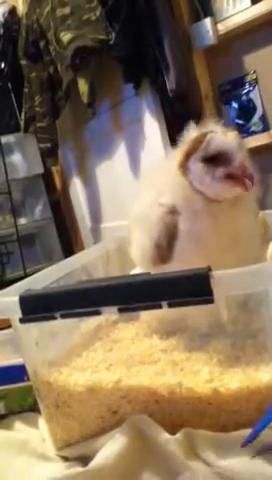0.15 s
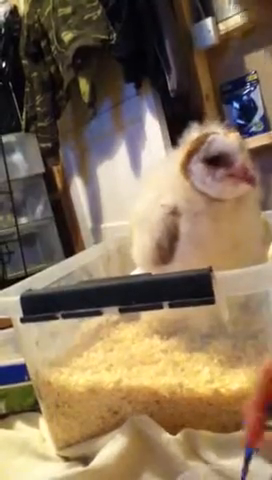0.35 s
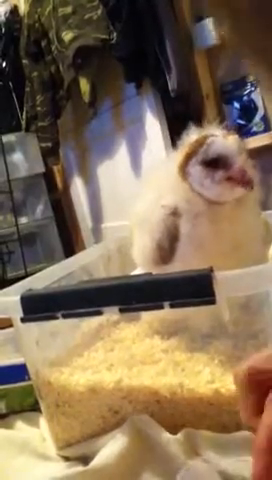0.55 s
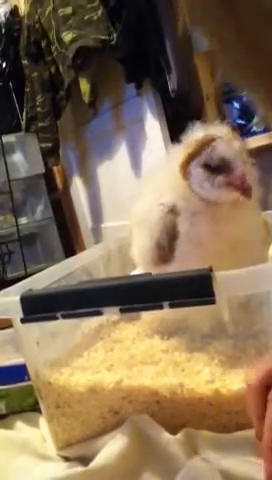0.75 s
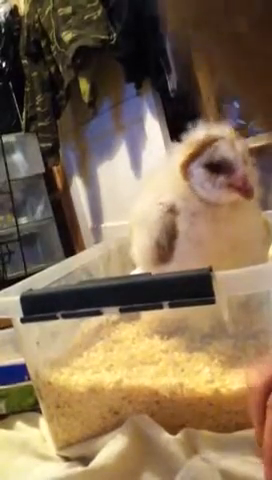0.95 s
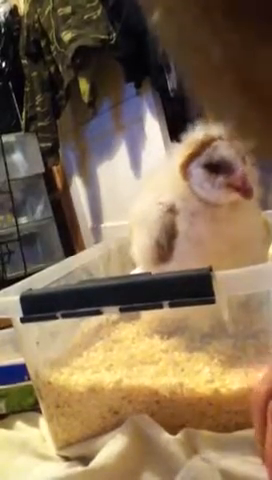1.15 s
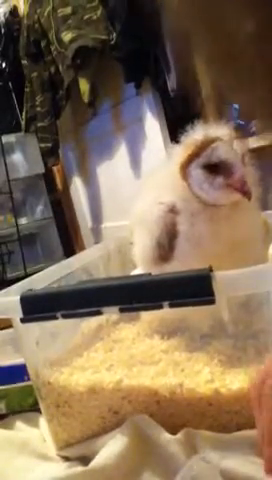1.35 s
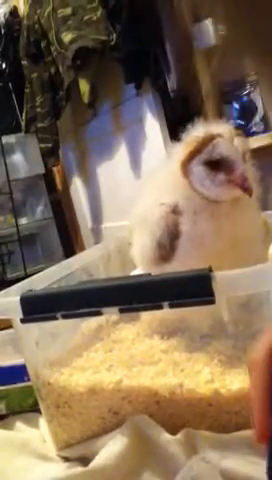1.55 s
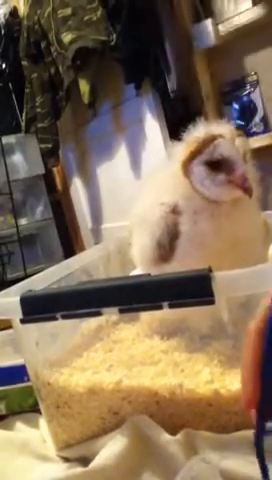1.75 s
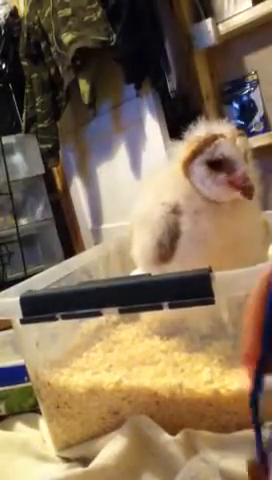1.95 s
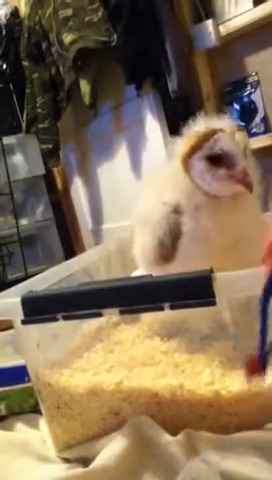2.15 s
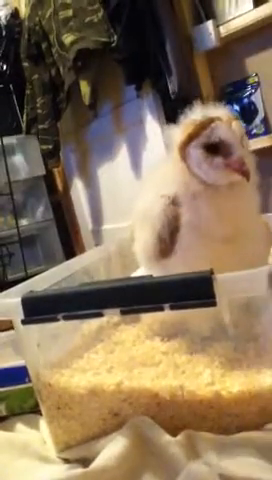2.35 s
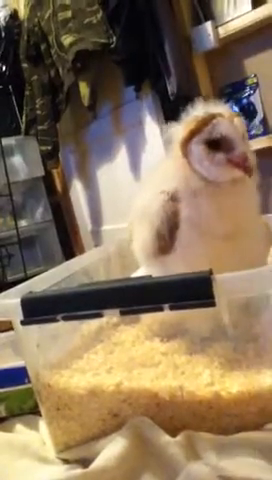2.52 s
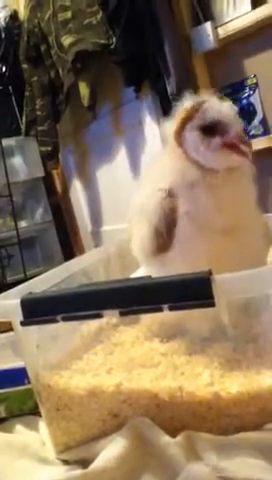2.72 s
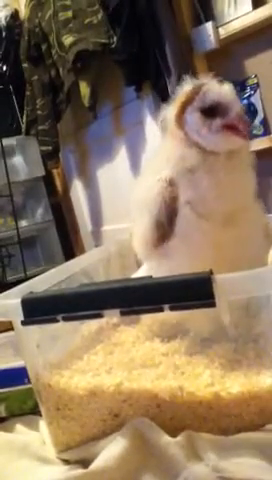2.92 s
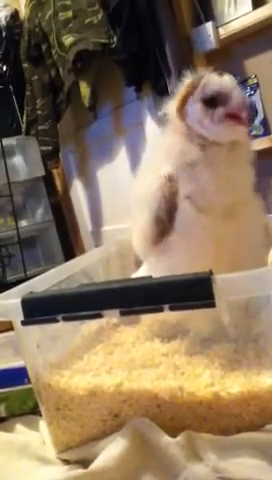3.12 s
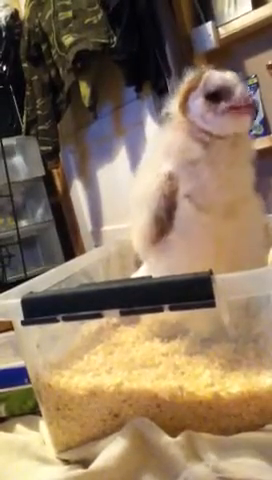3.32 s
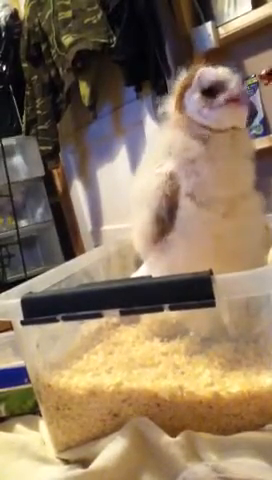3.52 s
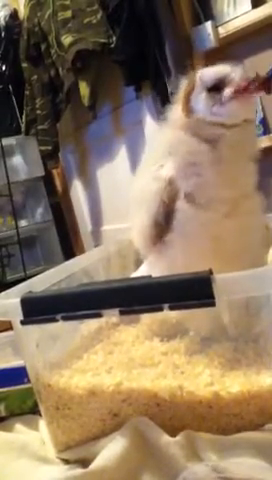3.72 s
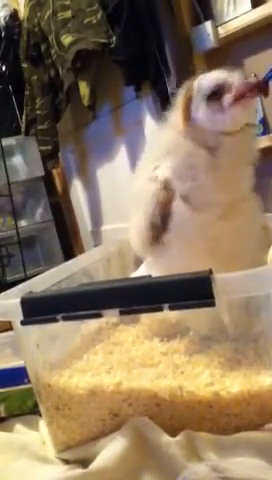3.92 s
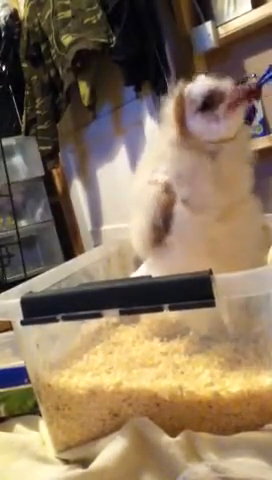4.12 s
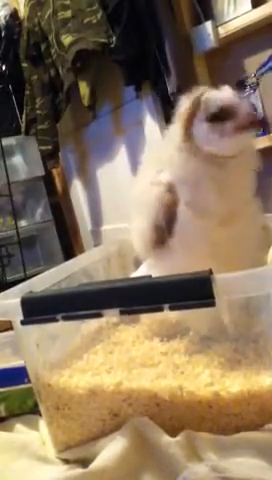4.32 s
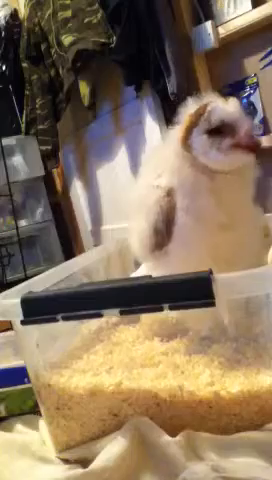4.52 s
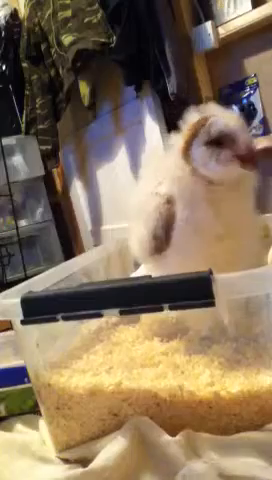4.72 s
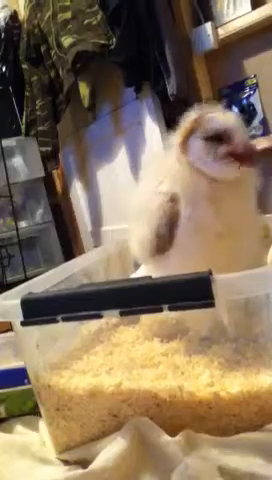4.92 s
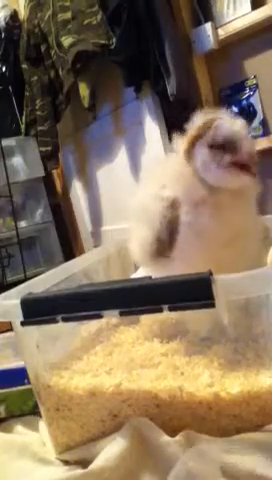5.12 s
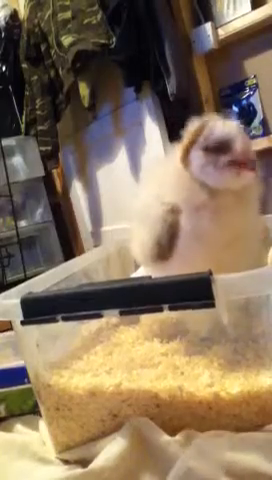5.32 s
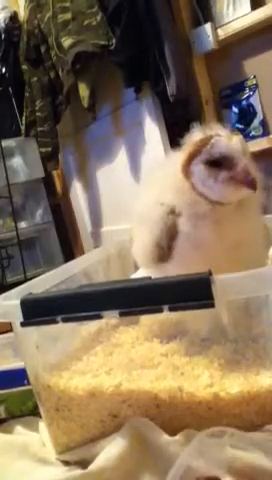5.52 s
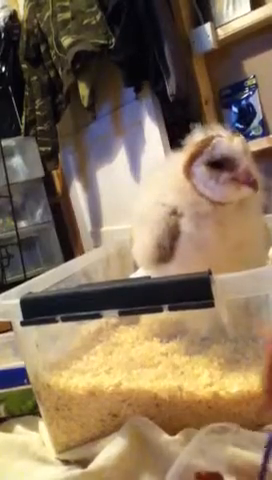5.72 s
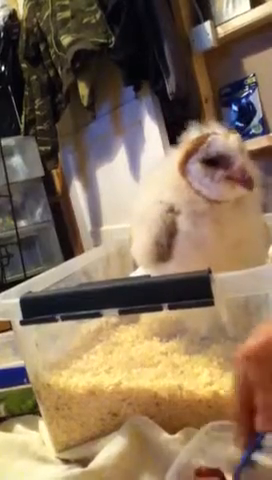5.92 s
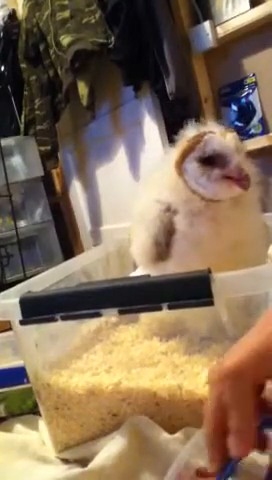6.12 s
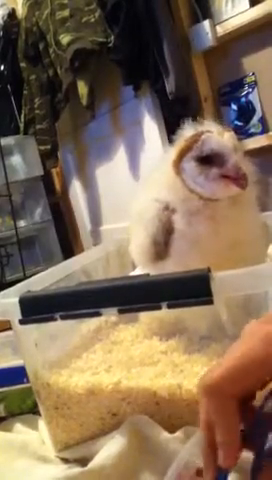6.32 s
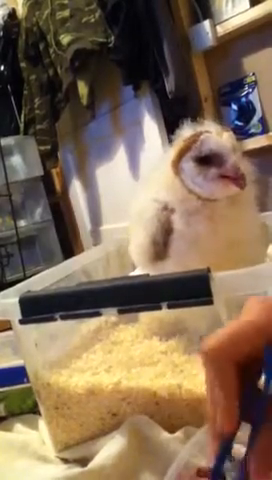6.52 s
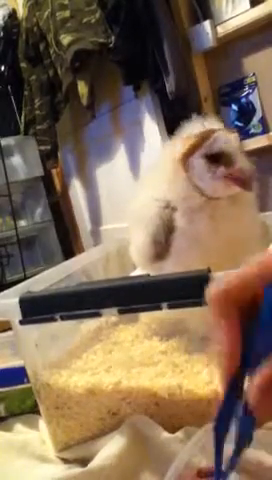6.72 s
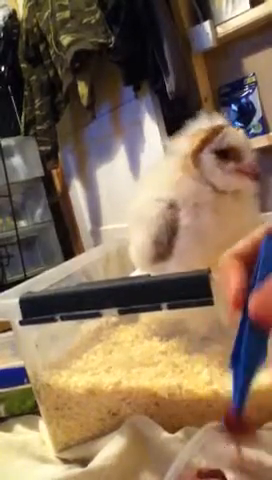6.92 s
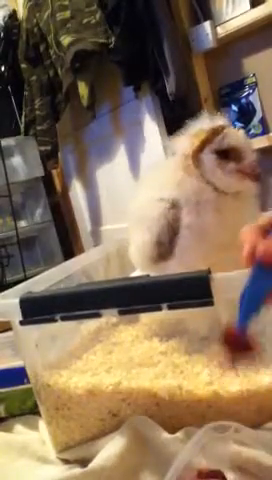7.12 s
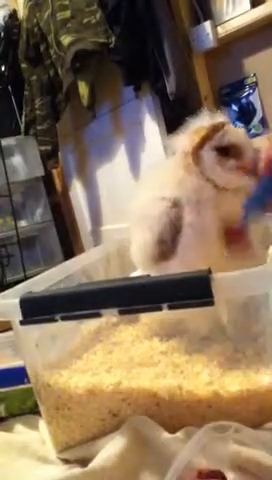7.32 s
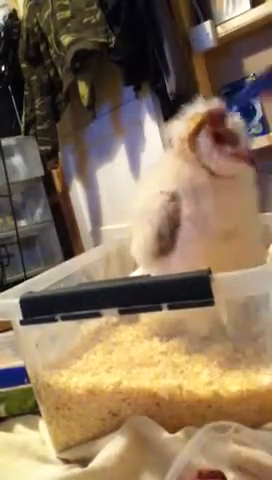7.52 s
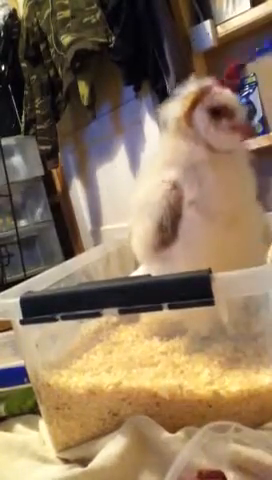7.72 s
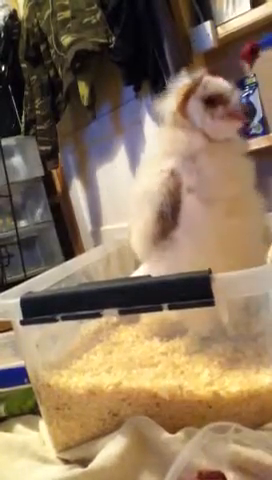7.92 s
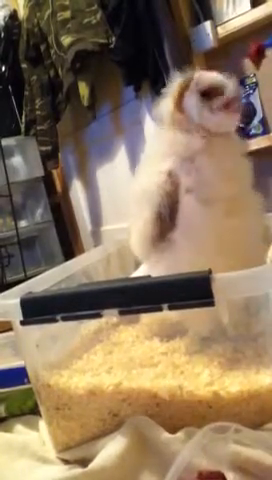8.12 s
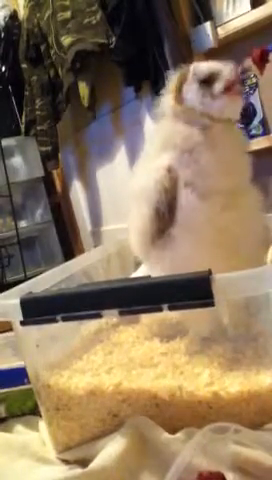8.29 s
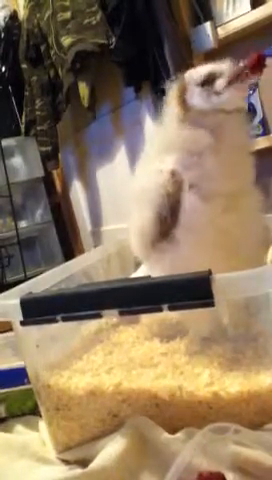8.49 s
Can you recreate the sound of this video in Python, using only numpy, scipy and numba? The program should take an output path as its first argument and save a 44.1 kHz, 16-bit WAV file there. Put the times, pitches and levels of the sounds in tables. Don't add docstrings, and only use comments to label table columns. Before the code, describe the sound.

A downy owl chick at arm's length gives four rasping, noisy hisses, each about three quarters of a second, swelling quickly and ending shut. Between them are small beak and tool ticks, slight cloth rustle and a faint distant whine. Small cluttered room, very short reverberation, low hum and soft hiss on a close mono phone microphone.

```python
import sys
import numpy as np
from scipy import signal
from scipy.fft import rfft, irfft
from scipy.io import wavfile
from scipy.ndimage import uniform_filter1d
from numba import njit

SR = 44100
rng = np.random.default_rng(int(sys.argv[2]) if len(sys.argv) > 2 else 0)


def master_out(mix):
    frames = np.transpose(np.atleast_2d(mix))
    ceiling = np.clip(frames, -1, 1)
    pcm = np.round(ceiling * 32767).astype(np.int16)
    wavfile.write(sys.argv[1], SR, pcm)


def natural_amplitude(level_db):
    exponent = np.asarray(level_db, float) / 20
    return 10 ** exponent


N = 377055


def level(x, db):
    return x * natural_amplitude(db) / np.sqrt(np.mean(x ** 2))


def add(out, start, sound, db):
    first = int(start * SR)
    out[first:first + len(sound)] += np.hanning(len(sound)) * level(sound, db)


@njit
def svf(x, hz, width):
    y, band, low = np.empty(len(x)), 0., 0.
    for i in range(len(x)):
        g = np.tan(np.pi * hz[i] / SR)
        damping = width[i] / hz[i]
        v = (band + g * (x[i] - low)) / (1 + g * (g + damping))
        band, low = 2 * v - band, low + 2 * g * v
        y[i] = damping * v
    return y


def causal(log_gain):
    cepstrum = irfft(log_gain)
    cepstrum[1:1024] *= 2
    cepstrum[1025:] = 0
    response = irfft(np.exp(rfft(cepstrum)))
    return response / np.sqrt(np.sum(response ** 2))


def resonances(modes, low_hz):
    f = np.linspace(1, SR / 2, 1025)
    power = sum(natural_amplitude(db) ** 2 / (1 + (2 * (f - hz) / width) ** 2) ** 1.5 for hz, width, db in modes)
    radiation = f ** 4 / (f ** 4 + low_hz ** 4)
    return causal(.5 * np.log(power * radiation))


def floor():
    # (frequency [Hz], level per Hz [dB])
    floor_shape = [(15, -52), (25, -17), (87, -2.5), (240, -2), (480, -11), (1190, -17.5), (8790, -22),
                   (15900, -24.5)]
    f = np.arange(N // 2 + 1) * SR / N + 1
    hz, db = np.array(floor_shape).T
    gain = natural_amplitude(np.interp(np.log(f), np.log(hz), db))
    return level(irfft(rfft(rng.standard_normal(N)) * gain, N), -56.5)


def rustle():
    # (start [s], end [s], centre [Hz], width [Hz], level [dB])
    brushes = [
        (0, .15, 2700, 600, -60),
        (.15, .27, 5000, 3000, -60),
        (2.04, 2.15, 2050, 600, -61),
        (7.45, 7.6, 130, 100, -58),
    ]
    out = np.zeros(N)
    grit = rng.standard_normal(N) * natural_amplitude(1.5 * rng.exponential(size=N))
    for start, end, hz, width, db in brushes:
        brush = grit[int(start * SR):int(end * SR)]
        add(out, start, svf(brush, hz + 0 * brush, width + 0 * brush), db)
    return out


def pips():
    # (start [s], end [s], first [Hz], last [Hz], level [dB])
    whistles = [
        (.703, .7105, 2600, 2600, -40),
        (2.587, 2.593, 3000, 3000, -49),
        (5.958, 5.968, 3600, 2700, -45),
        (8.015, 8.024, 3350, 2700, -41),
        (6.735, 6.752, 2600, 1950, -57),
        (6.748, 6.77, 3500, 2500, -55),
        (1.61, 1.74, 715, 690, -59),
        (1.7, 1.87, 700, 690, -66),
        (3.7, 3.78, 590, 590, -72),
    ]
    out = np.zeros(N)
    waver = 1 + .02 * level(uniform_filter1d(rng.standard_normal(N), size=500), 0)
    for start, end, hz, end_hz, db in whistles:
        glide = np.linspace(hz, end_hz, int((end - start) * SR))
        glide = glide * waver[int(start * SR):][:len(glide)]
        add(out, start, np.sin(2 * np.pi * np.cumsum(glide) / SR), db)
    return out


def ticks():
    # (time [s], peak level [dB], centre [Hz], width [Hz], decay by 60 dB [s])
    contacts = [(.172, -44, 4300, 1200, .012), (.173, -43, 6800, 3000, .008), (.174, -50, 2400, 900, .01),
                (.214, -46, 4300, 1200, .01), (.228, -49, 4500, 3000, .005), (1.899, -46, 6500, 5000, .004),
                (2.0555, -42, 400, 250, .012), (2.056, -43, 680, 400, .012), (2.057, -44, 2800, 450, .012),
                (2.158, -52, 400, 200, .03), (3.8036, -46, 8200, 5000, .004),
                (3.997, -49, 2500, 3000, .006), (4.716, -35, 10100, 6000, .004),
                (4.955, -45, 14000, 4000, .004), (5.4235, -46, 2200, 1600, .008),
                (5.7702, -44, 13500, 5000, .004), (6.817, -50, 2000, 2200, .008),
                (6.95, -48, 2200, 2000, .006), (7.28, -49, 3400, 2500, .006), (7.377, -47, 860, 1000, .012),
                (7.935, -47, 330, 250, .03)]
    out, t = np.zeros(N + 4096), np.arange(4096) / SR
    scrapes = rng.standard_normal((len(contacts), len(t)))
    for (start, db, hz, width, t60), grit in zip(contacts, scrapes):
        ring = (t == 0) + .12 * grit * np.exp(-np.log(1000) * t / t60)
        for _ in range(2):
            ring = svf(ring, hz + 0 * t, width + 0 * t)
        first = int(start * SR)
        out[first:first + len(t)] += natural_amplitude(db) * ring / np.abs(ring).max()
    return out[:N]


def closing():
    # (start [s], end [s], first centre [Hz], width [Hz], level [dB])
    breaths = [
        (1.385, 1.5, 2050, 350, -55),
        (1.38, 1.45, 3400, 900, -56),
        (3.39, 3.45, 1450, 120, -44),
        (6.72, 6.78, 1450, 500, -58),
    ]
    sink = .67
    out, air = np.zeros(N), rng.standard_normal(N)
    for start, end, hz, width, db in breaths:
        glide = np.linspace(hz, sink * hz, int((end - start) * SR))
        add(out, start, svf(air[int(start * SR):][:len(glide)], glide, width + 0 * glide), db)
    return out


def syrinx(effort):
    cycles = np.cumsum(420 + 800 * effort ** 2) / SR
    gap = rng.gamma(7, 1 / 7, N // 20)
    size = natural_amplitude(2.4 * rng.standard_normal(N // 20))
    snaps = np.cumsum(gap)
    now = snaps < cycles[-1]
    pops = np.bincount(np.searchsorted(cycles, snaps[now]), size[now], N)
    puff_s = .0008
    puffs = signal.lfilter([1], [1, -np.exp(-1 / (puff_s * SR))], pops)
    turbulence = puffs + .33 + 1.0 * effort ** 2
    air = 5.8 * pops + turbulence * rng.standard_normal(N)
    return air / np.sqrt(uniform_filter1d(air ** 2, size=1200))


def effort_db(t, length, full_db, swell_s, catch_s):
    opening_db, build_db_per_s = -43.5, 4
    shut_db, shut_share, fade_db_per_s = -47, .38, 330
    catch_db, catch_share = -4, .3
    body = full_db + build_db_per_s * (t - length)
    swell = (opening_db - body) * np.exp(-t / swell_s)
    stall = catch_db * np.exp(-((t - catch_s) / (catch_share * swell_s)) ** 2)
    shut = (shut_db - full_db) * np.exp(np.minimum(t - length, 0) / (shut_share * swell_s))
    return body + swell + stall + shut - fade_db_per_s * np.maximum(t - length, 0)


def owl():
    # (hiss starts [s], beak shuts [s], full level [dB], swell time [s], breath catches after [s])
    calls = [
        (0.7081, 1.397, -22, .075, .1),
        (2.591, 3.415, -18.5, 0.073, .032),
        (5.963, 6.733, -22, .055, .035),
        (8.022, 8.75, -17, .07, .04),
    ]
    # (treble hidden while opening [0-1], while shutting [0-1],
    # late posture reached after [s], extra fade [dB/s])
    beak_moves = [
        (0.73, 0.55, 0.68, 3),
        (0.24, 0.54, 0.55, 249.5),
        (0.08, .01, 0.63, -20),
        (.01, .01, 0.45, 1),
    ]
    # (early [Hz], late [Hz], width [Hz], early level [dB], late level [dB])
    sunk = [(1880, 2040, 730, -6, -8), (3150, 3090, 600, 0, -3.5), (3780, 3800, 1260, -1.5, -3.5),
            (5620, 5630, 1500, -2.5, -3.5)]
    stretched = [(1710, 1680, 380, -9.5, -10.5), (3160, 3020, 730, -4, -0.5), (4150, 4040, 800, -14, -12.5),
                 (5620, 5256, 1270, -6.5, -6.5)]
    reaching = [(1730, 1670, 270, -10, -7.5), (2900, 3060, 520, -3, 1), (4400, 4030, 970, -9.5, -7),
                (5670, 5500, 1000, -5.5, -6)]
    # (centre [Hz], width [Hz], early level [dB], late level [dB])
    beaks = [
        [(7580, 1660, -2.5, -5), (9830, 1500, -3.5, -7), (11350, 1100, -12, -9.5), (12500, 2000, -8.5, -15),
         (13950, 500, -17, -19), (15250, 700, -18, -28)],
        [(7070, 1100, -7, -10), (8050, 1470, -14, -1.5), (9250, 1700, -3, -13.5), (11900, 1600, -8.5, -30),
         (13400, 1100, -24, -10.5), (14360, 700, -11, -21), (15200, 700, -19, -19)],
        [(7162, 1110, -5, -10), (9550, 1400, -4, -9.5), (10300, 1400, -3.5, -10), (11950, 1500, -8.5, -9.5),
         (13650, 450, -13, -19), (14430, 500, -15, -13)],
        [(7330, 1600, -2.5, -2.5), (8336, 1010, -1.5, -5.5), (9730, 1400, -0.5, -5.5), (11550, 1900, -5, -7.5),
         (13950, 500, -25, -21), (14700, 500, -27, -28)],
    ]
    # (centre [Hz], width [Hz], level [dB])
    windpipe = [(690, 360, 17), (1000, 500, -10), (430, 260, -16)]
    # (time [s], centre [Hz], depth [0-1])
    echo_notch = [(.75, 8900, .98), (.85, 9000, .95), (.87, 8700, .01), (1.2, 8800, 0.2), (1.35, 9200, 0.8),
                  (2.6, 11200, .3), (2.88, 9500, .1), (2.93, 9550, .65), (3.07, 10300, .75),
                  (3.15, 12100, 0.99), (3.33, 12200, .98), (3.42, 11300, .8), (5.96, 8510, .06),
                  (6.7, 8410, .1), (8.02, 6486, 0.59), (8.25, 6160, 0.64)]
    settle_s = .11
    muffle_hz, opens_s, shuts_s = 7550, .16, .04

    time = np.arange(N) / SR
    out, level_db, shut = np.zeros(N), np.full(N, -120.), np.zeros(N)
    spans = [slice(int(start * SR), min(int(end * SR) + SR // 8, N)) for start, end, *_ in calls]
    for now, (start, end, *effort), (hidden_open, hidden_shut, _, fade) in zip(spans, calls, beak_moves):
        t = time[now]
        level_db[now] = effort_db(t - start, end - start, *effort) - fade * np.maximum(t - end, 0)
        opening = hidden_open * np.exp(-((t - start) / opens_s) ** 2)
        shutting = hidden_shut * np.clip(1 + (t - end) / shuts_s, 0, 1)
        shut[now] = opening + shutting
    air = syrinx(np.clip((level_db + 40) / 22, 0, 1))

    throats = (sunk, stretched, sunk, reaching)
    for now, call, moves, throat, beak in zip(spans, calls, beak_moves, throats, beaks):
        late = np.interp(time[now], [call[0] + settle_s, call[0] + moves[2]], [0, 1])
        for share, k in ((1 - late, 0), (late, 1)):
            modes = [(m[k], m[2], m[3 + k]) for m in throat]
            modes += [(m[0], m[1], m[2 + k]) for m in beak]
            voice = signal.fftconvolve(air[now], resonances(modes, low_hz=1300.0))[:len(share)]
            out[now] += share ** 0.85 * voice

    notch_s, notch_hz, notch_depth = np.array(echo_notch).T
    hz = np.interp(time, notch_s, notch_hz)
    depth = np.clip(np.interp(time, notch_s, notch_depth), 0, 1)
    width = 1000 * (hz * 1e-4) ** 2
    for _ in range(2):
        out = out - depth * svf(out, hz, width)

    def above(cut_hz):
        return signal.sosfiltfilt(signal.butter(2, cut_hz, "high", fs=SR, output="sos"), out)

    out = out - np.clip(shut, 0, 1) * above(muffle_hz)
    chest_db = np.minimum(-25.5 - 0.74 * (level_db + 22), 2)
    chest = signal.fftconvolve(air, resonances(windpipe, low_hz=302.0))[:N]
    bright = (natural_amplitude(0.5) - 1) * above(10800)
    return natural_amplitude(level_db) * (out + bright + natural_amplitude(chest_db) * chest)


def room(x, t60_s, wet_db, dull_hz):
    t = np.arange(SR // 2) / SR
    tail = rng.standard_normal(len(t)) * np.exp(-np.log(1000) * t / t60_s) * (t > .004)
    tail = signal.sosfilt(signal.butter(1, dull_hz, fs=SR, output="sos"), tail)
    tail = tail / np.sqrt(np.sum(tail ** 2))
    return x + natural_amplitude(wet_db) * signal.fftconvolve(x, tail)[:N]


def scene():
    sources = owl() + closing() + ticks() + pips()
    mono = room(sources, t60_s=0.12, wet_db=-15.0, dull_hz=2520) + rustle() + floor()
    return np.array([mono, mono])


def thin_treble(x, margin_db, slope_db, waver_db, dead_db, top_hz):
    f, _, z = signal.stft(x, SR, "cosine", 2048, 1024)
    f, z = f[:1024, None], z[:1024]
    power = np.abs(z) ** 2
    band = power.reshape(128, 8, -1).mean(axis=1)
    waver = np.repeat(rng.standard_normal(band.shape), 8, axis=0)
    band = np.repeat(band, 8, axis=0)
    under_db = slope_db * (top_hz - f) / 1000
    loud = power[90:560].mean(axis=0)
    limit = natural_amplitude(margin_db + waver_db * waver - under_db) ** 2 * loud
    weakest = natural_amplitude(dead_db - 2 * under_db) ** 2 * uniform_filter1d(power, size=40, axis=0)
    keep = (band > limit) & (power > weakest)
    z = z * (keep | (f < 5000)) * (f < top_hz)
    return signal.istft(np.vstack([z, 0 * z[:1]]), SR, "cosine", 2048, 1024)[1][:N]


def low_pass(x):
    return signal.sosfilt(signal.butter(12, 16070, fs=SR, output="sos"), x)


def record(dry):
    mono = thin_treble(dry[0], margin_db=-14, slope_db=.7, waver_db=2.5, dead_db=1, top_hz=16000)
    return low_pass(np.array([mono, mono]))


dry = scene()
out = record(dry)
master_out(out)
```